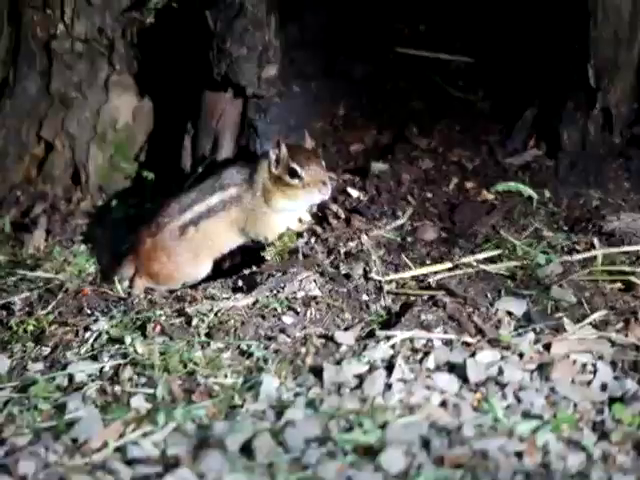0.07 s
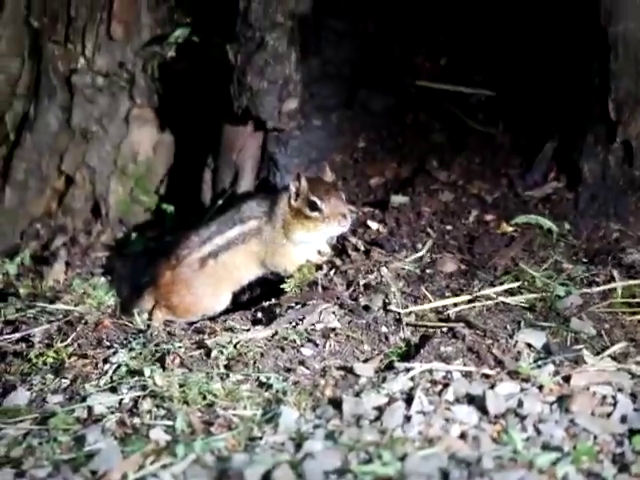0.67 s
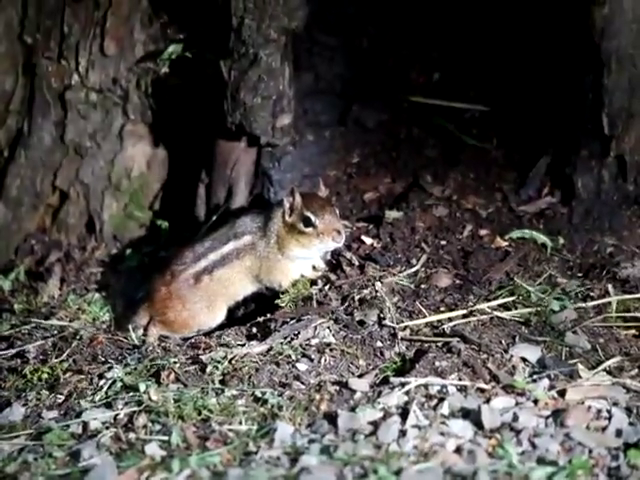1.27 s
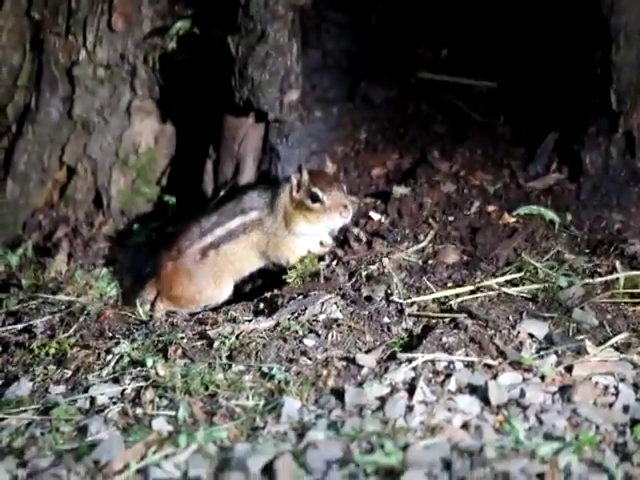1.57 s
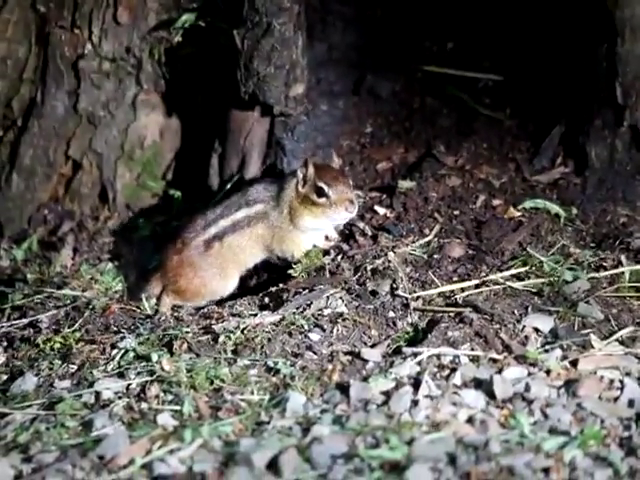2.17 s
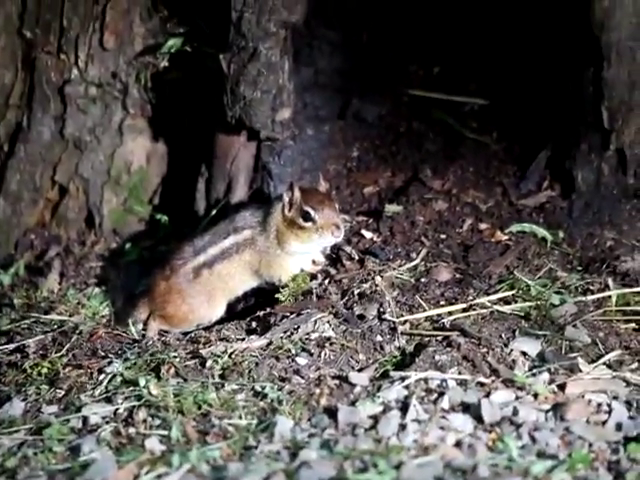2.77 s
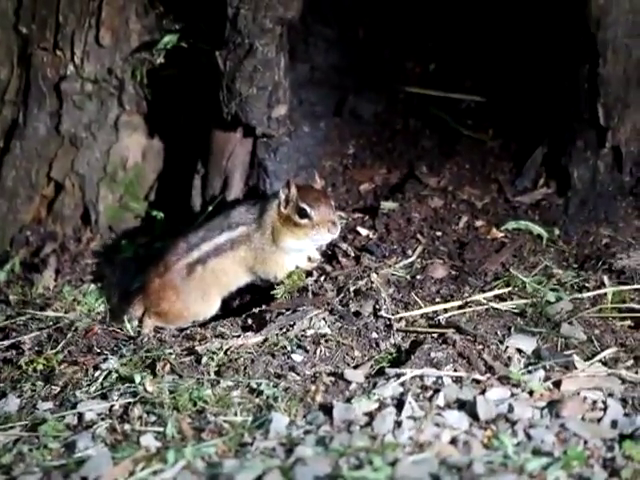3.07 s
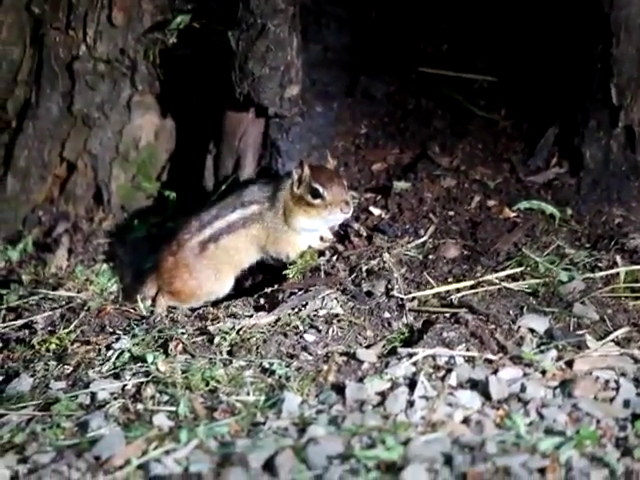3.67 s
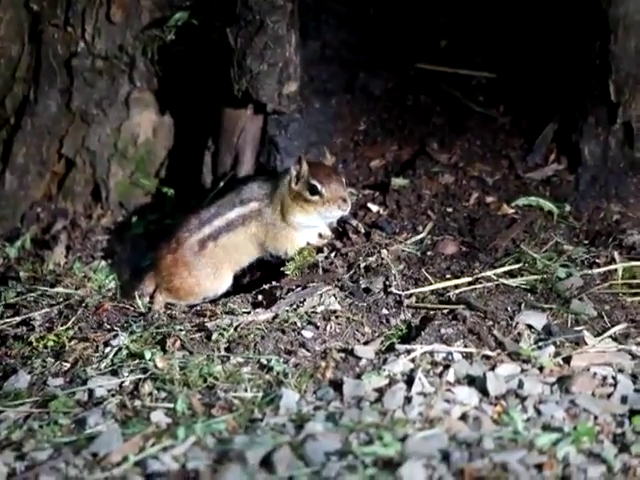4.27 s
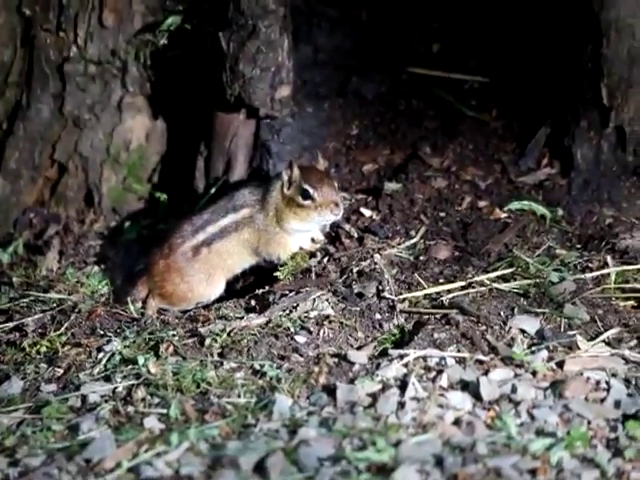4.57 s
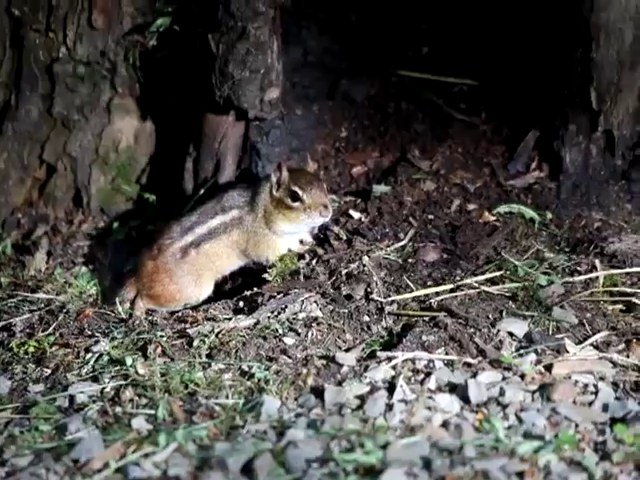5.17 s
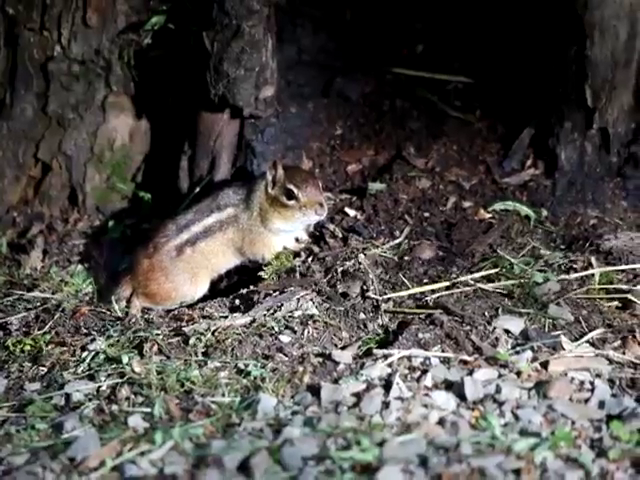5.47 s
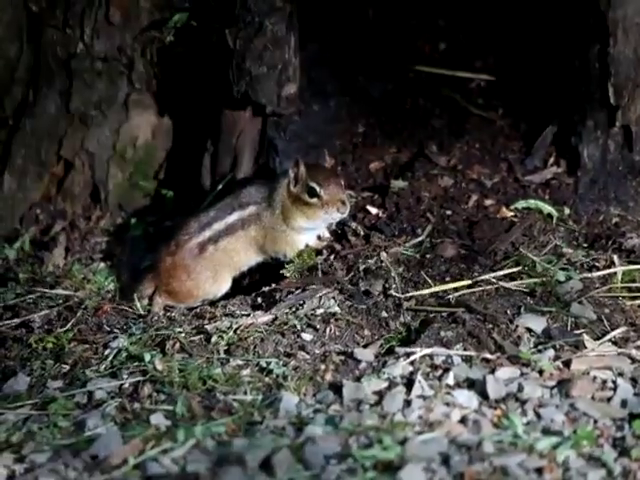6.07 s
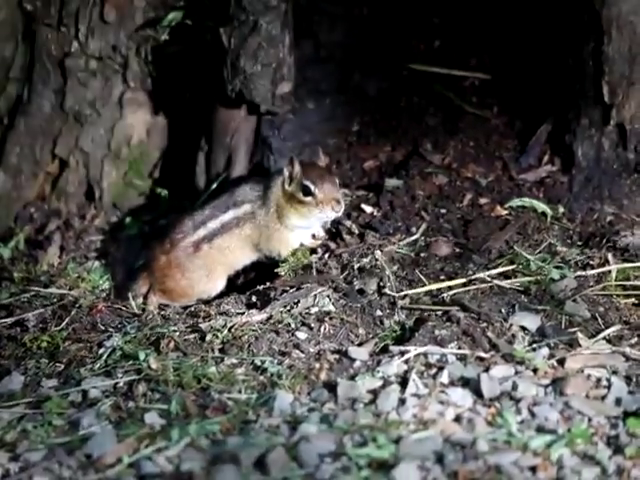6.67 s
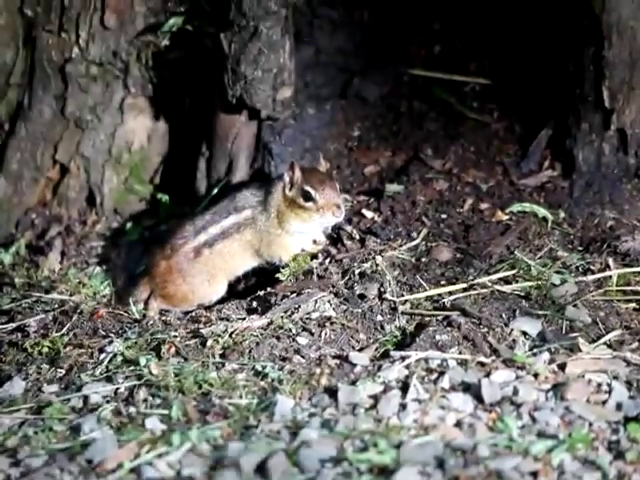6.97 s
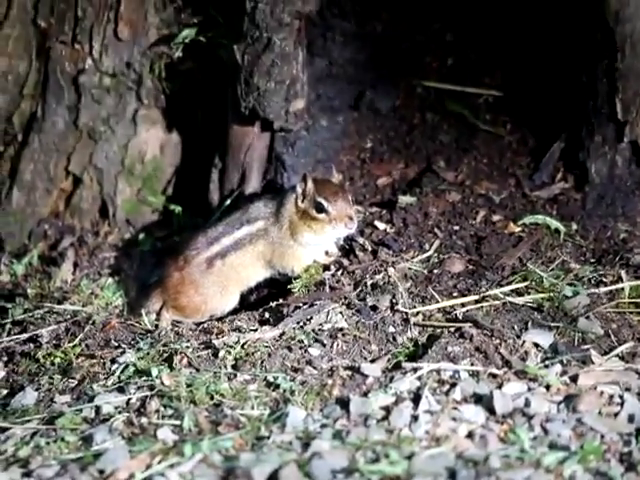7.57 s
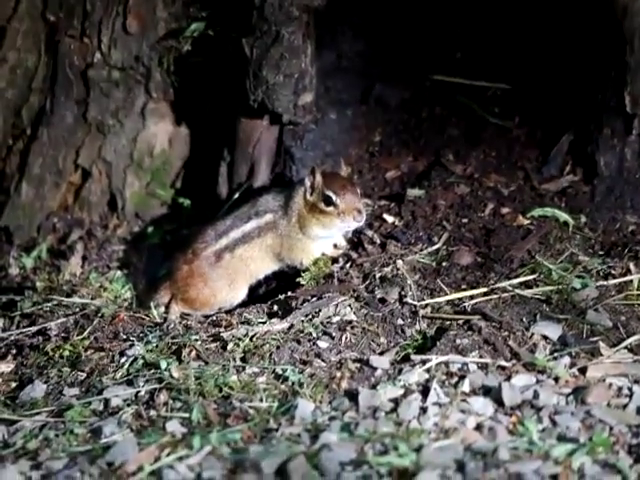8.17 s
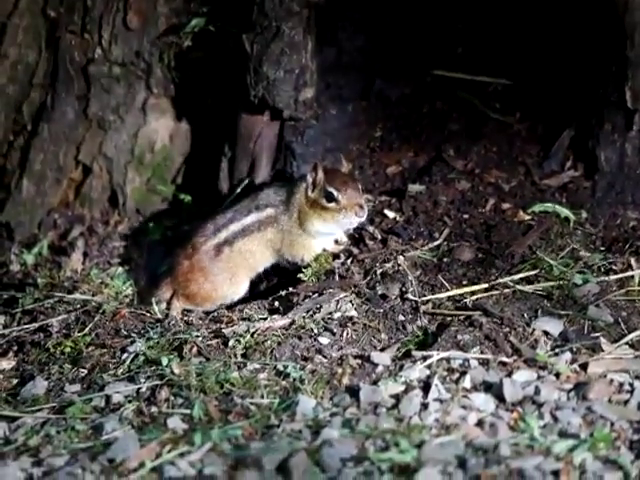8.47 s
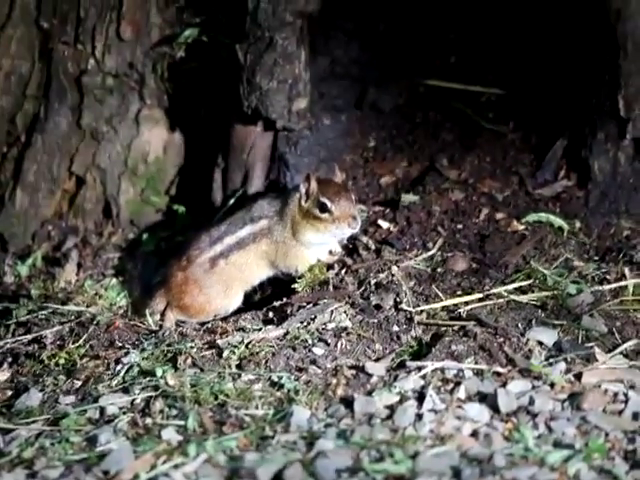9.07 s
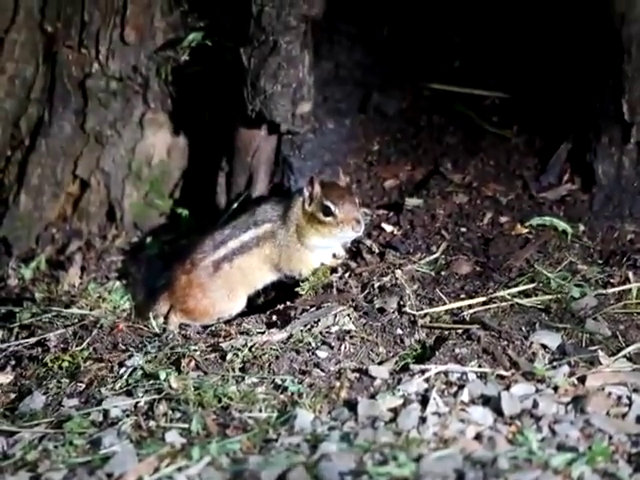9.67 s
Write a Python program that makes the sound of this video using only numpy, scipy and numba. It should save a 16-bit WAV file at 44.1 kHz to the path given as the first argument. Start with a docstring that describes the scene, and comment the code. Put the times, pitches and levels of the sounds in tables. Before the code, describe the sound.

A chipmunk chips close by in a forest, starting at about 0.2 seconds and repeating evenly every 0.6 to 0.7 seconds, fifteen times, until about 9.8 seconds. Each chip is a loud, very short, high whistle that dives in pitch and leaves a brief hissing echo. Other chipmunks answer throughout with fainter, shrill chips, several a second, one sounding a little nearer from about 7.4 seconds. Very faint, distant songbirds give slurred whistles around 1.6 to 2.3 seconds and again around 6.3 to 6.9. A far-off crow caws about five times, barely audible and echoing, between 3.6 and 5.2 seconds. Tiny, dull scuffs in the leaf litter come near 0.6, 8.1 and 9.5 seconds. Underneath runs a quiet, thin electric hum with soft outdoor air, dipping slightly after the loudest chips.

```python
"""A chipmunk chips close by at the foot of a tree, and its neighbours answer from deeper in the forest.
Each chip is one fast falling whistle that the trunks scatter into a hissing tail. Songbirds and a crow
call far off, and the leaf litter rustles now and then. Underneath lies a bed of thin electric hum and
soft air. The camera's gain control ducks the whole mix after the loud near chips."""
import sys
import numpy as np
from scipy import signal
from scipy.fft import rfft, irfft, next_fast_len
from scipy.io import wavfile
from scipy.ndimage import uniform_filter1d
from numba import njit

SR = 44100
rng = np.random.default_rng(int(sys.argv[2]) if len(sys.argv) > 2 else 0)


def digitize_waveform(pressure):
    """Quantize a signal to 16-bit integers and store it at the path in sys.argv[1].

    Rows of a 2-D input are taken as channels; values are limited to [-1, 1].
    """
    field = np.atleast_2d(pressure).T
    bounded = np.clip(field, -1, 1)
    quanta = np.round(bounded * 32767).astype(np.int16)
    wavfile.write(sys.argv[1], SR, quanta)


N = 432621
TIME = np.arange(N) / SR

# partials of the electric hum: (frequency [Hz], rms level before the swell [dB])
HUM_PARTIALS = [(274.7, -62), (498.7, -59.7), (773.5, -44.5), (997.4, -62), (1272.2, -69), (1547.2, -62.5),
                (1770.9, -56.5), (2045.8, -43), (2269.7, -69.5)]
# noise bands around the hum: (centre [Hz], width [Hz], rms level before the swell [dB])
RUSH_BANDS = [(1958, 170, -46.5), (1171, 25, -60), (1577, 150, -57), (2197, 27, -58.5)]
# tone of the forest air: (frequency [Hz], gain [dB])
AIR_EQ = [(25, -20), (60, -1), (180, -3), (300, 4.5), (430, 0.5), (600, 3), (850, 6.5), (1350, -5),
          (1700, -6), (2500, -8.5), (3500, -3.5), (7500, -2), (11000, -24), (15000, -24)]
# slow fader ride on the whole bed: (time [s], gain [dB])
BED_SWELL = [(0, 1), (.5, 1), (1.3, -4), (2, -2.5), (2.6, -6), (3.6, -4), (5.2, -7), (6.9, -3.5), (8.3, -7),
             (8.95, -2), (9.8, -5)]
# the neighbours' chips: (time [s], caller [name], top pitch [Hz], level [dB])
ANSWER_CUES = [ (0.1394, "shrill", 12000, -26), (0.3293, "low far", 8590, -31.5),
               (0.6188, "shrill", 11700, -26.5), (0.8362, "low far", 8150, -32.5),
               (1.04, "shrill", 11750, -26.5), (1.4613, "shrill", 11900, -28),
               (1.775, "shrill far", 12600, -36.5), (2.0243, "low far", 8940, -30.5),
               (2.074, "shrill", 11850, -28), (2.3014, "low far", 8300, -35.5),
               (2.5208, "shrill", 11800, -29.5), (2.622, "low far", 7540, -31.5),
               (3.046, "shrill", 11560, -28), (3.335, "low far", 8140, -29), (3.546, "shrill", 11750, -29),
               (3.875, "low far", 8140, -28.5), (4.0233, "shrill", 11700, -29.5),
               (4.3386, "low far", 7950, -32), (4.5579, "shrill", 11700, -32.5),
               (4.8306, "low far", 7800, -34), (5.0815, "shrill", 11100, -30.5),
               (5.393, "low far", 7490, -33), (5.8982, "shrill", 11440, -30.5),
               (6.2017, "middle", 9450, -32.5), (6.278, "dull far", 8434, -39.5),
               (6.5037, "low far", 9000, -33.5), (6.672, "dull far", 7400, -46),
               (6.85, "low far", 7140, -34), (6.966, "shrill far", 12100, -44),
               (7.111, "middle", 9260, -27.5), (7.401, "close", 10350, -28.5),
               (7.46, "dull far", 8500, -41), (7.806, "close", 10600, -28), (8.161, "middle", 8780, -29),
               (8.3127, "low far", 8180, -32), (8.385, "shrill far", 11820, -51),
               (8.51, "close", 9560, -24.5), (8.901, "close", 10440, -28), (9.0854, "low far", 7500, -28.5),
               (9.262, "close", 10210, -24), (9.388, "shrill far", 11800, -41),
               (9.728, "close", 10650, -26)]
# each neighbour's voice and placement, by name:
# (hold [s], fall [s], attack [s], direct level [dB], direct tilt [dB/octave], ground bounce [gain])
CALLER_VOICES = { "shrill": (.006, .0255, 0.012, 3, 3.4, 0.013), "shrill far": (.011, .029, .008, 0, 4, .2),
                 "low far": (.008, .022, .011, -6, 0, .25), "dull far": (.009, .021, .012, 1, -16, .4),
                 "middle": (.007, .023, 0.011, 2.1, 3.3, 0.69),
                 "close": (0.000963, .0265, 0.021, 2.2, 8, 1.2)}
# how well each pitch carries: (frequency [Hz], gain [dB])
CARRY_EQ = [(3000, -19), (4200, -6), (5000, 4), (6200, -3.5), (8200, 2), (10000, -6), (12000, -19.5),
            (15000, -34)]
# what trunks and leaves throw back; air soaks up the treble:
# (frequency [Hz], gain [dB], decay time [multiple of the base decay])
SCATTER_BANDS = [(1025.4, 4, 2.5), (3770, 1, 0.67), (4130, 4, 1.64), (4950, 4, 1.46), (5460, 1, 1.57),
                 (7200, 6.5, 1.13), (8870, 6, 0.99), (9900, 3.5, 0.92), (15725, 9, 0.84)]
# the near chipmunk's chips: (time [s], level [dB])
CHIP_CUES = [(.218, -.5), (.881, -2), (1.547, -2), (2.204, -5), (3.0675, .5), (3.7172, -.5), (4.333, -4.5),
             (4.927, -3), (5.627, -5.5), (6.356, -2.5), (7.108, -3.5), (7.8, -3.5), (8.5125, -3.5),
             (9.1505, -.5), (9.7645, -3.5)]
# scuffs in the leaf litter: (time [s], rms level [dB])
RUSTLE_CUES = [(0.609, -46.5), (8.144, -52), (9.54, -50)]
# songbird slurs: (time [s], length [s], start pitch [Hz], end pitch [Hz], level [dB])
SONG_CUES = [(1.588, 0.19, 2204, 3270, -54), (1.749, 0.047, 3050, 2300, -53),
             (1.81, 0.082, 2346, 3300, -50.5), (2.258, 0.057, 2490, 2930, -61),
             (5.823, 0.11, 2354, 2749, -69), (6.282, 0.24, 2200, 3370, -56),
             (6.525, .075, 2436, 3340, -50.5), (6.62, 0.254, 5173, 5218, -58),
             (6.867, 0.053, 3100, 2810, -53)]
# the crow's caws: (time [s], rms reverb send [dB])
CAW_CUES = [(3.598, -56), (3.95, -51.5), (4.351, -56), (4.741, -55.5), (5.128, -56), (5.42, -73)]


def undb(db):
    """Decibels to gain."""
    return 10 ** (np.asarray(db) / 20)


def level(x, db):
    """Scale to an rms level."""
    return x * undb(db) / np.sqrt(np.mean(x ** 2))


def eq_gain(curve, hz):
    """Gain of an EQ curve at the given frequencies."""
    curve_hz, db = np.transpose(curve)
    return undb(np.interp(np.log(np.maximum(hz, 1)), np.log(curve_hz), db))


def equalise(x, curve):
    """Filter through an EQ curve."""
    size = next_fast_len(len(x))
    gain = eq_gain(curve, np.fft.rfftfreq(size, 1 / SR))
    return irfft(rfft(x, size) * gain, size)[:len(x)]


def resonance(x, hz, width_hz):
    """A steep band-pass: two identical resonators in series."""
    b, a = signal.iirpeak(hz, hz / width_hz, fs=SR)
    return signal.lfilter(b, a, signal.lfilter(b, a, x))


def wobble(rate_hz, size=N):
    """Smooth random modulation with a spread near 1."""
    step = max(int(SR / rate_hz), 1)
    return uniform_filter1d(np.repeat(rng.standard_normal(size // step + 1), step), step)[:size]


def phase_of(hz):
    """Phase of a moving pitch."""
    return 2 * np.pi * np.cumsum(hz) / SR


def add(track, at_s, x):
    """Drop a sound onto a track."""
    i = max(int(at_s * SR), 0)
    track[i:i + len(x)] += x[:max(N - i, 0)]


def hum_and_air(waver_db=0.64, drift=0.00042):
    """The bed: a wavering electric hum, the rush of its resonances and soft air, swelling together."""
    hum = np.zeros(N)
    for hz, db in HUM_PARTIALS:
        amplitude = np.sqrt(2) * undb(db + waver_db * wobble(6))
        hum += amplitude * np.sin(phase_of(hz * (1 + drift * wobble(9))))
    rush = sum(level(resonance(rng.standard_normal(N), hz, width), db) for hz, width, db in RUSH_BANDS)
    air = level(equalise(rng.standard_normal(N), AIR_EQ), db=-45) * undb(1.04 * wobble(6.1))
    return (hum + rush + air) * undb(np.interp(TIME, *np.transpose(BED_SWELL)))


def chip_shape(top_hz, low_hz, hold_s, fall_s, attack_s, release_s=0.003, droop=0.08):
    """Pitch and envelope of a chip: a brief hold on top, a bell-shaped dive, a droop as it stops."""
    length_s = hold_s + 1.6 * fall_s
    t = np.arange(0, length_s, 1 / SR)
    height = np.exp(-(np.maximum(t - hold_s, 0) / fall_s) ** 2)
    release = np.minimum((length_s - t) / release_s, 1)
    hz = (low_hz + (top_hz - low_hz) * height) * (1 - droop * (1 - release))
    return hz, np.minimum(t / attack_s, 1) * release


def whistle(hz, second_db, third_db):
    """A near-sine whose overtones open up as the dive brings them into the range that carries."""
    phase = phase_of(hz)
    tone = np.sin(phase)
    for harmonic, db in ((2, second_db), (3, third_db)):
        tone += undb(db) * eq_gain(CARRY_EQ, harmonic * hz) * np.sin(harmonic * phase)
    return tone


def neighbours(low_hz=2498, waver=0.0072, bounce_s=0.00023904, stem_db=-12, stem_spread_s=0.0083):
    """Farther chipmunks answer with diving whistles, much of their sound scattered by the trees."""
    direct, send = np.zeros(N), np.zeros(N)
    for at_s, caller, top_hz, db in ANSWER_CUES:
        hold_s, fall_s, attack_s, direct_db, tilt_db, bounce = CALLER_VOICES[caller]
        pitch, envelope = chip_shape(top_hz, low_hz, hold_s, fall_s, attack_s)
        hz = pitch * (1 + waver * wobble(602.7, len(pitch)))
        chip = envelope * undb(db) * eq_gain(CARRY_EQ, hz) * whistle(hz, second_db=-14, third_db=-31.5)
        tilted = undb(direct_db + tilt_db * np.log2(hz / 6000)) * chip
        # the ground bounce notches the middle of the dive; nearby stems break it up further
        stems = [(lag_s, undb(stem_db)) for lag_s in stem_spread_s * rng.random(4)]
        for lag_s, gain in [(0, 1), (bounce_s, bounce)] + stems:
            add(direct, at_s + lag_s, gain * tilted)
        add(send, at_s, chip)
    return direct + forest_reverb(send, decay_s=0.65, early_db=-49, early_s=0.014, grain=0.25)


def forest_reverb(x, decay_s, early_db, early_s, grain, build_s=0.0078):
    """Countless echoes: a dense burst off the nearest trunks, then a tail that is shorter up top."""
    t = TIME[:2 ** 16]
    burst = (1 + undb(early_db) * np.exp(-t / early_s)) * np.minimum(t / build_s, 1) ** 2
    echoes = rng.standard_normal(len(t)) * np.exp(grain * wobble(400, len(t))) * burst
    echoes /= np.sqrt(np.sum(echoes ** 2 * undb(-120 * t / decay_s)))  # unit energy at the base decay
    centres, band_db, decay_ratio = np.transpose(SCATTER_BANDS)
    spectrum, hz = rfft(echoes), np.fft.rfftfreq(len(t), 1 / SR)
    bands = [irfft(spectrum * np.interp(hz, centres, solo)) for solo in np.eye(len(centres))]
    fades = undb(band_db[:, None] - 60 * t / (decay_s * decay_ratio[:, None]))
    return signal.fftconvolve(x, np.sum(bands * fades, axis=0))[:N]


def near_chipmunk(waver=0.0064, flutter_db=1.06, mouth_hz=6386, mouth_width_hz=620, reverb_db=-20):
    """The lead voice: an abrupt, almost pure whistle that dives over an octave in 30 ms."""
    voice, knocks = np.zeros(N), np.zeros(N)
    pitch, envelope = chip_shape(top_hz=8348, low_hz=3562, hold_s=0.001, fall_s=0.018, attack_s=0.007)
    # the mouth rings as the dive passes through its resonance
    mouth_db = -6 + 8 * np.exp(-((pitch - mouth_hz) / mouth_width_hz) ** 2)
    # a faint hollow knock trails each chip
    progress = np.linspace(0, 1, int(0.011 * SR))
    knock_hz = 1050 * (1.1 - 0.14 * progress)
    knock = undb(-42) * np.sin(np.pi * progress) ** 2 * np.sin(phase_of(knock_hz))
    for at_s, db in CHIP_CUES:
        hz = pitch * (1 + waver * wobble(830, len(pitch)))
        amplitude = envelope * undb(db + mouth_db + flutter_db * wobble(470, len(pitch)))
        add(voice, at_s, amplitude * whistle(hz, second_db=-19, third_db=-13.5))
        add(knocks, at_s + 0.037, knock)
    tail = forest_reverb(voice, decay_s=0.74, early_db=12, early_s=0.071, grain=0.46)
    mix = voice + knocks + undb(reverb_db) * tail
    add(mix, 0.001261, undb(-21) * voice)  # ground bounce
    return mix


def rustles(length_s=0.03):
    """Brief dull scuffs in the leaf litter: soft puffs of band-passed noise."""
    scuffs = np.zeros(N)
    envelope = np.hanning(int(length_s * SR))
    for at_s, db in RUSTLE_CUES:
        puff = envelope * rng.standard_normal(len(envelope))
        add(scuffs, at_s, level(resonance(puff, hz=1100, width_hz=1500), db))
    return scuffs


def songbirds(direct_db=2.5, reverb_db=6):
    """Distant slurred whistles, smeared by the trees."""
    song = np.zeros(N)
    for at_s, length_s, from_hz, to_hz, db in SONG_CUES:
        glide_hz = np.linspace(from_hz, to_hz, int(length_s * SR))
        envelope = signal.windows.tukey(len(glide_hz), 0.3)
        add(song, at_s, undb(db) * envelope * np.sin(phase_of(glide_hz)))
    tail = forest_reverb(song, decay_s=0.72, early_db=-7, early_s=0.036, grain=1.0)
    return undb(direct_db) * song + undb(reverb_db) * tail


def crow(base_hz=480, throat_hz=1450, length_s=0.096, rasp=0.145):
    """Hoarse caws, all reverb; only the throat's main resonance carries this far."""
    caws = np.zeros(N)
    arch = np.sin(np.pi * np.linspace(0, 1, int(length_s * SR)))
    for at_s, db in CAW_CUES:
        hz = base_hz * (0.94 + 0.074 * arch + rasp * wobble(500, len(arch)))
        buzz = arch * signal.sawtooth(phase_of(hz))
        add(caws, at_s - length_s / 10, level(resonance(buzz, throat_hz, width_hz=300), db))
    return forest_reverb(caws, decay_s=1.4, early_db=3, early_s=0.04, grain=0.3)


@njit
def gain_control(over_db, hold_s, release_db_per_s):
    """Gain reduction in dB: grabs each overshoot, holds, then lets go."""
    reduction = np.empty(len(over_db))
    cut_db, wait_s = 0., 0.
    for i in range(len(over_db)):
        wait_s -= 1 / SR
        if over_db[i] > cut_db:
            cut_db += 0.3 * (over_db[i] - cut_db)
            wait_s = hold_s
        elif wait_s < 0:
            cut_db = max(cut_db - release_db_per_s / SR, 0.)
        reduction[i] = cut_db
    return reduction


def scene():
    """The calls and rustles over the bed, in mono."""
    return (near_chipmunk() + neighbours() + songbirds() + crow() + rustles() + hum_and_air())[None]


def record(dry, start_s=0.055, threshold_db=-6.5, cutoff_hz=15400):
    """The camera cuts in, ducks after each loud peak and shaves off the top end."""
    x = dry[0] * (TIME > start_s)
    over_db = 20 * np.log10(np.abs(x) + 1e-9) - threshold_db
    ducked = x * undb(-gain_control(over_db, hold_s=0.12, release_db_per_s=19.0))
    low_pass = signal.ellip(8, 0.2, 70, cutoff_hz, fs=SR, output="sos")
    return signal.sosfilt(low_pass, ducked)[None]


dry = scene()
out = record(dry)
digitize_waveform(out)
```